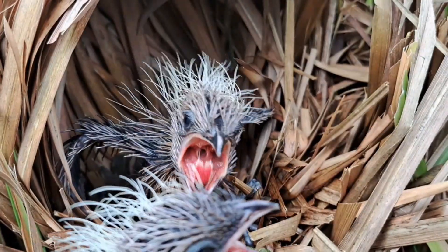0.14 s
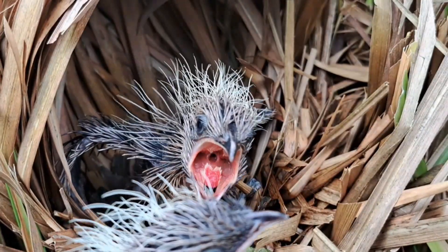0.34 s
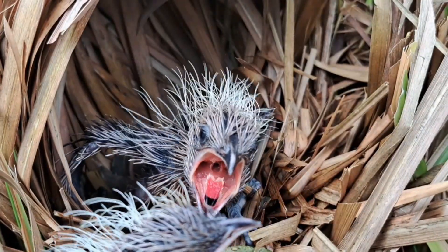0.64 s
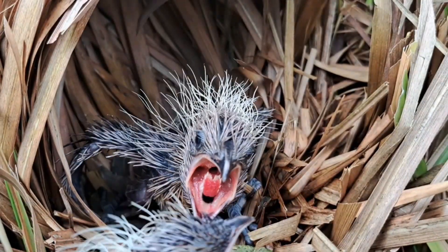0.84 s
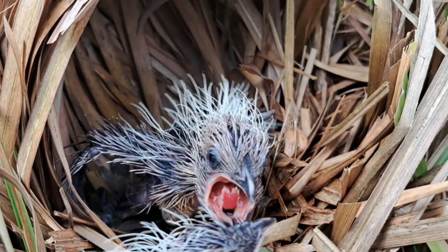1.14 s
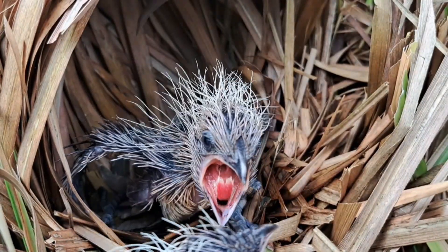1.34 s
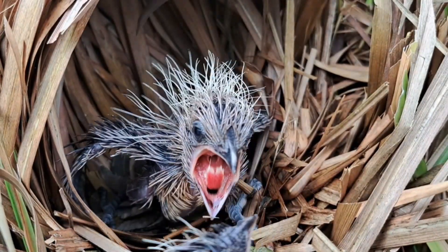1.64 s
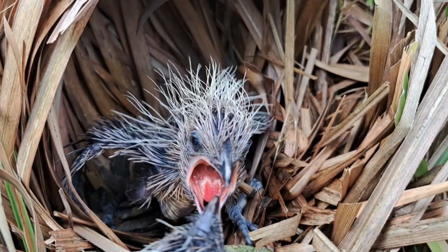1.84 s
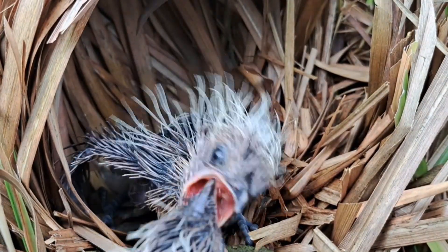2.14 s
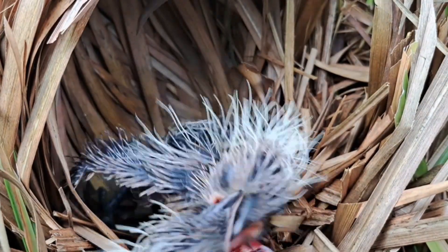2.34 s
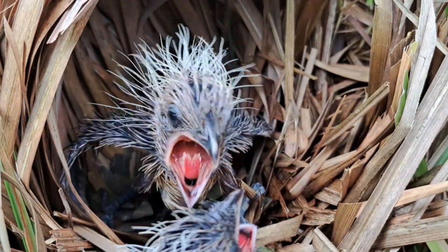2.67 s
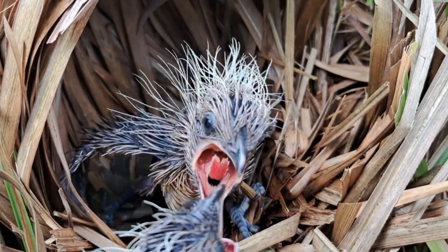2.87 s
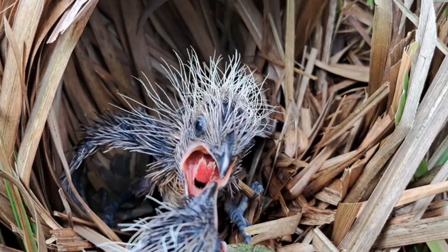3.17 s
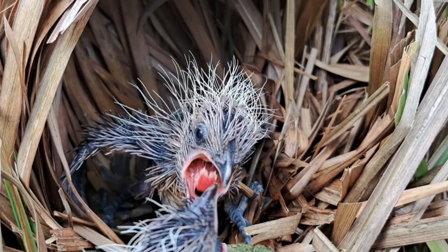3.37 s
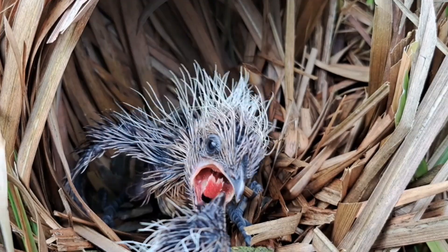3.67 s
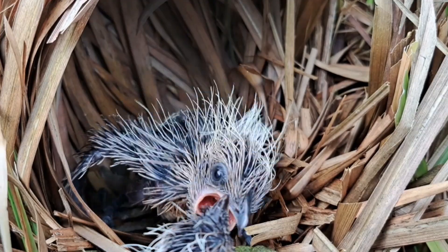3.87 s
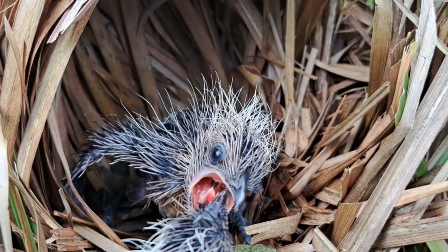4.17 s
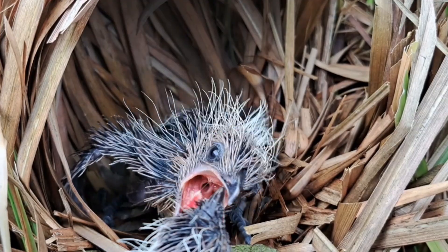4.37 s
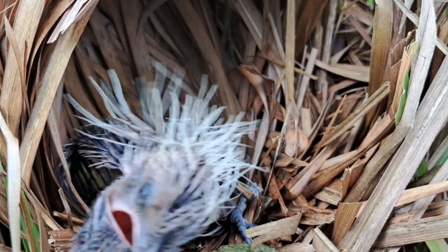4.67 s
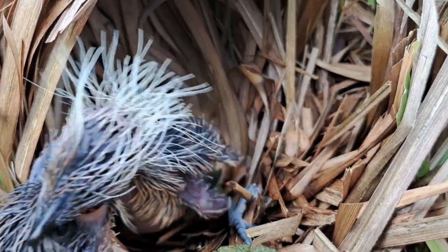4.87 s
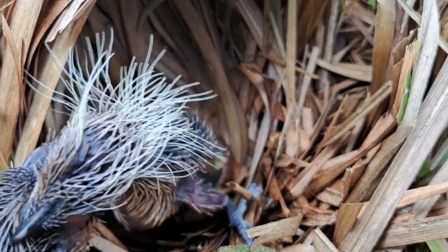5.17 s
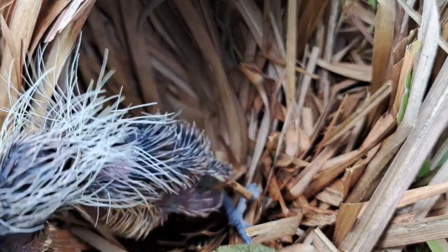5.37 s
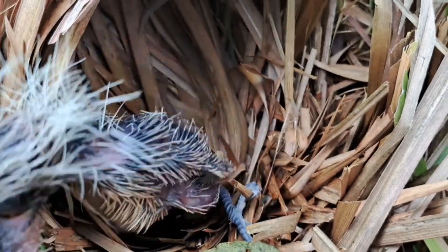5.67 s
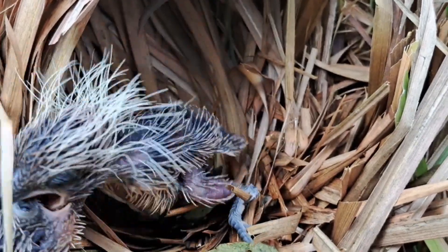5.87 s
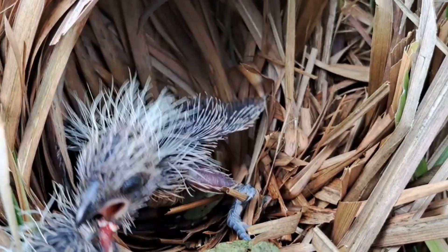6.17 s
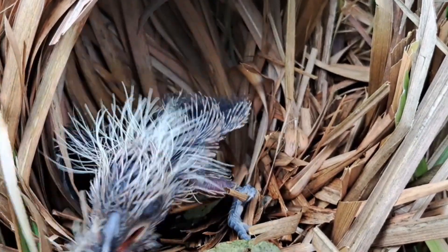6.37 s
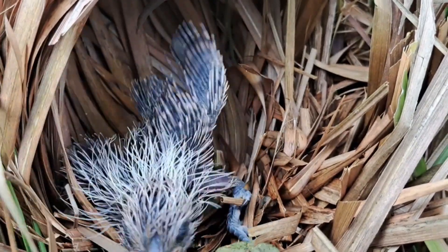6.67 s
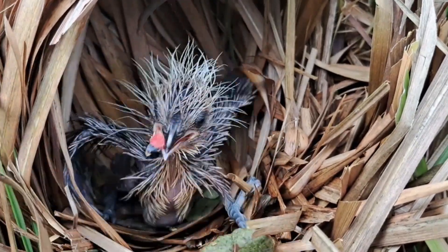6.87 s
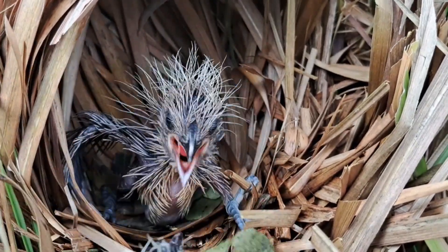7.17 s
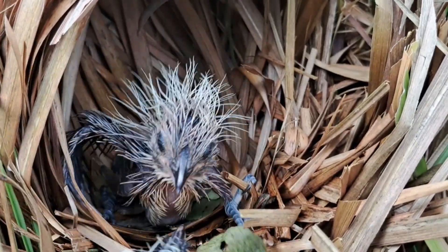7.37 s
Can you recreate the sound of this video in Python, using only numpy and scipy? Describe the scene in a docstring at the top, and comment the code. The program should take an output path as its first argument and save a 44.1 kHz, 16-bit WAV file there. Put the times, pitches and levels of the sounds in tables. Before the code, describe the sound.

From the start, nestlings very close on the left beg in harsh, buzzing rasps, each about an eighth of a second, around six a second, with a gritty throat buzz and bright sizzling top. Soft short whines slip between at 0.1, 0.5 and 0.7 s; a dry snap falls at 1.0. From 1.65 to 2.2 s the rasps crowd and overlap, then break off with a snap, straw rustle and small whines. At 2.5 s steady rasping resumes until 4.5 s. Then it is much quieter: hoarse whines and low squawks, scattered bill snaps and crackling straw, busiest around 5.3 to 5.8 s. From 6.1 s gliding squawks come closer together, growing brighter and stronger through 7.3 s, ending with one rasp to 7.5 s. The right side is weaker, muffled and diffuse; a faint low outdoor rumble continues throughout.

```python
"""Loud buzzing begging rasps close by on the left, about six a second, with soft whines between them.
The whines take over while the chicks jostle, then gliding squawks build up to a last rasp.
Nestlings in a nest of dry reeds: each call is a rough train of syrinx pulses that rings the throat
(1-7 kHz) and the open gape (8-15 kHz). Bills snap and straw crackles over a faint outdoor rumble."""
import sys
import numpy as np
from scipy import signal
from scipy.fft import rfft, irfft, next_fast_len
from scipy.io import wavfile
from scipy.ndimage import uniform_filter1d, map_coordinates

SR = 44100
rng = np.random.default_rng(int(sys.argv[2]) if len(sys.argv) > 2 else 0)


def persist_wave(psi):
    """Save psi, clipped to +-1, as 16-bit WAV."""
    counts = np.round(np.clip(psi, -1, 1) * 32767).astype(np.int16)
    wavfile.write(sys.argv[1], SR, np.atleast_2d(counts).T)


N = 331191

# Levels in the tables are relative; mix trims follow.
# Begging rasps. Each row: start in seconds, end in seconds, time to the peak in seconds, gape level in dB,
# gape brightness in dB per octave, throat level in dB, clear tone level in dB, base pitch in Hz,
# glide as a share of the pitch.
BEG_CALLS = [(-0.012, 0.113, 0.036, -26.5, -2, -43, -47.5, 1015, 0.064),
             (0.128, 0.261, 0.057, -30, -5.5, -43.5, -53, 983, 0.053),
             (0.295, 0.429, 0.043, -31, -6.5, -43, -54, 976, -0.0064),
             (0.448, 0.575, 0.044, -29.5, -1, -43.5, -48.5, 968, 0.01),
             (0.592, 0.718, 0.045, -28, 0, -42.5, -43.5, 983, 0.064),
             (0.734, 0.878, 0.053, -30.5, -9.5, -42, -46, 975, 0.077),
             (0.88, 1.008, 0.064, -31.5, -6.5, -42.5, -47.5, 966, 0.02),
             (1.05, 1.177, 0.044, -30, -4.5, -42, -50, 995, 0.14),
             (1.198, 1.341, 0.054, -30.5, -6, -42.5, -52.5, 1001, 0.053),
             (1.353, 1.509, 0.049, -31.0, -4.5, -43, -50, 990, 0.056),
             (1.507, 1.673, 0.049, -32, -5.5, -43.5, -51.0, 988, 0.07),
             (1.657, 1.769, 0.041, -29, 2, -42.5, -51.5, 991, 0.13),
             (1.724, 1.841, 0.039, -34, -14.5, -47.5, -49.5, 983, 0.17),
             (1.807, 1.926, 0.047, -29.5, 1, -41.5, -49.5, 998, 0.035),
             (1.881, 2.01, 0.051, -32.5, -13.5, -44.5, -49, 1018, 0.25),
             (1.978, 2.083, 0.045, -28.0, 2.5, -40.5, -49, 990, 0.077),
             (2.042, 2.155, 0.035, -32, -1.5, -42, -50.5, 966, 0.011),
             (2.138, 2.237, 0.032, -32, -4.5, -46.5, -51.5, 918, 0.01),
             (2.467, 2.627, 0.045, -29.5, -2, -43.5, -45, 897, -0.21),
             (2.612, 2.755, 0.065, -28.5, -8, -41, -45.5, 958, 0.017),
             (2.784, 2.918, 0.056, -30, -10, -43, -52, 974, -0.062),
             (2.941, 3.076, 0.052, -30.0, -8, -41.5, -44.5, 988, 0.07),
             (3.099, 3.233, 0.058, -31.5, -8, -44, -49, 979, 0.16),
             (3.257, 3.396, 0.056, -31, -5, -43.5, -49.5, 975, 0.14),
             (3.412, 3.58, 0.067, -34, -9.5, -43, -48.5, 986, 0.15),
             (3.566, 3.722, 0.071, -34, -8.0, -42.5, -47, 981, 0.19),
             (3.724, 3.88, 0.073, -32.5, -7, -42.5, -49.5, 996, 0.16),
             (3.891, 4.044, 0.072, -33, -4.5, -43, -53.5, 995, 0.086),
             (4.05, 4.205, 0.075, -32, -5, -43.0, -51, 997, 0.1),
             (4.213, 4.369, 0.082, -32, -5.5, -42.5, -50.5, 1012, 0.18),
             (4.38, 4.522, 0.069, -31.5, -3, -43, -51, 1020, 0.28),
             (7.35, 7.484, 0.053, -33, -4, -45, -54, 1023, 0.08)]
# Course of the begging. Each row: time in seconds, width of the swell as a share of the call,
# strongest harmonic as a number, breath relative to pulses as a ratio, lower voice in Hz,
# lower voice level in dB.
BEG_COURSE = [(0, 0.34, 1.68, 0.87, 679, -57), (1.099, 0.32, 2.06, 0.78, 754, -64),
              (2.001, 0.48, 1.45, 0.85, 743, -59.5), (2.15, 0.38, 1.77, 0.61, 729, -73),
              (2.552, 0.3, 1.84, 0.96, 733, -57), (3.1, .42, 1.5, 0.97, 794, -58),
              (4.4, 0.4, 1.53, 0.89, 839, -53.5), (7.4, 0.35, 1.05, 0.73, 763, -60.5)]
# Soft whines. Each row: start in seconds, end in seconds, throat level in dB, gape level in dB,
# clear tone level in dB, pitch at start in Hz, pitch at end in Hz, arch as a share of the pitch.
WHINE_CALLS = [(0.112, 0.182, -56, -42.5, -59, 957, 640, -0.041),
               (0.529, 0.634, -57.5, -41, -61, 893, 550, -0.056),
               (0.703, 0.792, -55, -35, -55, 950, 1050, -0.28),
               (2.308, 2.444, -56, -40.5, -57.5, 820, 980, -0.29),
               (2.44, 2.526, -62, -40.5, -68, 454, 850, 0.055),
               (2.88, 2.983, -56, -54, -65, 734, 910, -0.033),
               (4.401, 4.54, -46, -62, -60, 1047, 1000, 0.041),
               (4.539, 4.732, -57, -56.5, -66, 900, 630, 0.041),
               (4.731, 4.847, -49, -46.5, -50.5, 987, 840, 0),
               (5.164, 5.321, -53.5, -55.5, -55, 650, 720, 0.1),
               (5.589, 5.67, -50.5, -57, -61, 717, 490, 0.06),
               (5.948, 6.112, -53, -48.5, -51.5, 669, 940, -0.023),
               (6.313, 6.42, -54, -49, -59, 755, 800, 0.017),
               (6.733, 6.813, -46, -43, -52, 522.4, 380, 0.049),
               (7.223, 7.317, -59, -43.5, -53, 955, 1080, -0.0077)]
# Squawks. Each row: start in seconds, end in seconds, throat level in dB, gape level in dB,
# clear tone level in dB, gape peak as a share of the call, arch as a share of the pitch, then start and
# end in Hz of the pitch, of the throat resonance and of the gape resonance.
SQUAWK_CALLS = [(4.923, 5.124, -55.5, -53.5, -56, 0.31, -0.048, 760, 568, 2760, 2570, 12400, 12000),
                (5.351, 5.583, -52, -45.5, -57, .6, 0.049, 718, 833, 2570, 3900, 11600, 13100),
                (5.787, 5.952, -52.5, -51, -69, .5, 0.14, 768, 689, 2780, 4170, 8700, 11600),
                (6.118, 6.318, -50.5, -43.5, -59, 0.55, 0.03, 773, 906, 3470, 4500, 10800, 12500),
                (6.38, 6.547, -49, -38.5, -47.5, 0.37, 0.11, 659, 851, 2510, 4800, 10700, 12900),
                (6.496, 6.629, -48, -37, -49.5, 0.58, -0.094, 738, 739, 3700, 4150, 12000, 12200),
                (6.669, 6.798, -54, -35.5, -48.5, 0.43, -0.1, 864, 900, 3840, 1390, 13100, 11700),
                (6.802, 6.949, -50.5, -35, -49, 0.49, -0.089, 613, 1087, 1850, 2400, 14200, 14700),
                (7.001, 7.151, -49.5, -29.5, -60, 0.34, 0.24, 1006, 1070, 1420, 3370, 13600, 14300),
                (7.157, 7.29, -49, -32.5, -50.5, 0.63, -0.043, 765.5, 843, 3300, 3440, 12700, 13800)]
# Narrow to broad gliding bands of the calls: single harmonics, whistles and hoarse streaks.
# Each row: start in seconds, end in seconds, level in dB, start in Hz, end in Hz,
# arch as a share of the frequency, width in Hz.
GLIDING_BANDS = [(0.042, 0.048, -45.5, 1470, 1300, -0.016, 60), (2.15, 2.224, -50.5, 1830, 1670, .04, 25),
                 (2.15, 2.22, -62, 3700, 3100, 0.039, 60), (2.154, 2.225, -54, 4570, 4100, 0.035, 90),
                 (2.327, 2.419, -63.5, 734, 860, -0.22, 25), (4.449, 4.531, -50.5, 4150, 4450, 0, 398),
                 (4.664, 4.718, -62, 5800, 5500, 0.033, 60), (4.765, 4.827, -57.5, 5530, 5000, 0.034, 350),
                 (4.965, 5.058, -65, 1486, 1230, -0.052, 30),
                 (4.748, 4.828, -58.5, 3780, 3400, -0.011, 130),
                 (5.429, 5.569, -61.5, 4100, 4900, 0.032, 101),
                 (6.524, 6.618, -55, 3950, 4170, -0.013, 59.4),
                 (6.675, 6.712, -55.5, 3950, 2500, 0.029, 258), (7.018, 7.127, -58, 1088, 1180, .11, 70),
                 (7.108, 7.148, -55, 3500, 4250, -0.0054, 850), (7.352, 7.443, -57, 4900, 5400, .02, 1010)]
# Throat resonance of the rasps, before tilt. Each row: frequency in Hz, gain in dB.
BEG_THROAT_RESPONSE = [(300, -46), (560, -12), (750, -6), (950, -15.5), (1200, -3), (1500, 2.5),
                       (1950, -4.5), (2400, -1.5), (2950, -5.5), (3300, -2.5), (3900, -1.5), (4700, 1.5),
                       (5250, -8), (5800, -1.5), (6700, 0.5), (7400, -8.5), (8600, -9)]
# Gape resonance of the rasps, before tilt. Each row: frequency in Hz, gain in dB.
BEG_GAPE_RESPONSE = [(6500, -34.5), (7500, -25), (8300, -15.5), (9200, -13), (10200, -6), (11000, -3),
                     (12000, -6.5), (13000, -6), (14600, -4), (15600, -10.5)]
# Throat resonance of whines and squawks, before tilt. Each row: frequency in Hz, gain in dB.
SOFT_THROAT_RESPONSE = [(300, -15), (500, -9.5), (740, -1), (1050, -3), (1550, 2.5), (2300, -2), (3100, -3),
                        (4100, -3.5), (5000, -4), (6000, -7.5), (7400, -19), (8800, -36)]
# Gape resonance of whines and squawks, before tilt. Each row: frequency in Hz, gain in dB.
SOFT_GAPE_RESPONSE = [(6000, -30.5), (7500, -17.5), (9000, -9.5), (10500, -5.5), (12000, -6.5), (13300, -4),
                      (14500, -11), (15600, -5.5)]
# Bill snaps and breaking straws. Each row: time in seconds, body level in dB, crack level in dB.
SNAP_EVENTS = [(0.998, -53, -45), (2.23, -52.5, -45), (2.241, -64, -46), (4.656, -77, -43.5),
               (4.741, -72, -46), (4.885, -75, -41.5), (5.072, -83, -49.5), (5.271, -59, -46),
               (5.323, -63, -41), (5.33, -47, -53), (5.509, -51, -49), (5.676, -61, -47),
               (5.711, -63, -47.5), (5.75, -70, -46), (5.775, -61, -53), (6.64, -63, -53),
               (6.726, -80, -40.5), (7.332, -72, -52)]
# Spectrum of the dull knock. Each row: frequency in Hz, gain in dB.
KNOCK_RESPONSE = [(300, -16.5), (800, -15.5), (1500, -3), (2200, -9.5), (3200, -11), (4500, -7),
                  (7000, -27), (12000, -43)]
# Spectrum of the bright crack. Each row: frequency in Hz, gain in dB.
CRACK_RESPONSE = [(3000, -7), (7000, -5), (10500, 0), (13500, 4.5), (15500, 1.5)]
# Shuffling in the straw, one table per scuffle. Each row: time in seconds, crackle level in dB.
SCUFFLES = [
    [(2.15, -64), (2.26, -54.5), (2.45, -54)],
    [(4.5, -52), (4.9, -49.5), (5.12, -61), (5.35, -44), (5.6, -51), (6.25, -48), (6.6, -63), (6.98, -55),
     (7.51, -99)],
]
# The nest as the shaded right port hears it. Each row: frequency in Hz, gain in dB.
FAR_PORT_RESPONSE = [(400, -21), (770, -12.5), (1200, -14.5), (1800, -19.5), (2740, -26), (4200, -17.5),
                     (5300, -4.5), (6500, -11.5), (8000, 0.5), (9800, -26), (12000, -17.5), (15000, -31)]
# Part of that scattered by the reeds. Each row: frequency in Hz, scattered level in dB.
REED_SCATTER = [(700, -4.5), (2000, 6), (4000, -0.5), (8000, 1), (15000, 12.5)]
# Outdoor air at the left port. Each row: frequency in Hz, relative gain in dB.
AIR_LEFT_RESPONSE = [(20, -29), (55, -25), (90, -14), (140, 0), (220, -17), (400, -17), (1000, -18.5),
                     (4000, -15), (15000, -25)]
# Outdoor air at the right port. Each row: frequency in Hz, relative gain in dB.
AIR_RIGHT_RESPONSE = [(20, -13), (40, -0.5), (58, 8.5), (90, 0), (140, 1.5), (260, -4.5), (450, -15),
                      (1000, -25), (4000, -33.5), (15000, -23.5)]
# Slow course of the rumble. Each row: time in seconds, level in dB.
RUMBLE_COURSE = [(0, 2), (3.0, 1), (4.2, 2.5), (5.5, -4.5), (7.51, -0.5)]

BEG_ATTACK_S, BEG_RELEASE_S = 0.03, 0.0397  # the bill opens and shuts
BEG_FALLOFF = 1.5  # steepness of the flanks of the swell
PITCH_SAG = 0.05  # share of the pitch missing until the effort builds
END_SWEEP = 0.8  # the glide steepens as the call ends
LOWER_VOICE_DIP, LOWER_VOICE_RISE, LOWER_VOICE_SPREAD = 0.25, 0.2004, 0.049  # shares of its pitch
LOWER_VOICE_OCTAVE_DB = 4
OVERTONES_DB, OVERTONE_SPREAD_DB, OVERTONE_WIDTH_HZ = -8, 4, 170  # level before loss to breath
WHINE_PEAK, WHINE_SHARPNESS = 0.41, 2.4
WHINE_RING_RATIO, WHINE_RING_WIDTH_HZ, WHINE_RING_DB = 4.5, 1600, -4.5  # ratio to the pitch
WHINE_CLARITY_DB = -0.5  # harmonics against rasp in the resonance
SQUAWK_PEAK, SQUAWK_SHARPNESS = 0.44, 3.8
SQUAWK_RING_WIDTH_HZ, SQUAWK_RING_DB = 1220, -2.5
SQUAWK_GAPE_WIDTH_HZ, SQUAWK_GAPE_DB = 2850, -8
SQUAWK_CLARITY_DB = -5  # added to tone minus throat level: harmonics in the throat resonance
BEG_JITTER_PER_BREATH, SOFT_JITTER = 0.042, 0.04  # unevenness of the pulses, as a share of a cycle
WOBBLE = 0.013  # share of the pitch
PULSE_DIRECT = 1.8  # direct pulse against its quick echoes
PUFF_DECAY_S = 0.0006
GUSTS_PER_S = 8.8
CUTOFF_HZ = 15700


def begs():
    """Loud buzzing rasps: pitch climbs with effort; swell, breath and lower voice change over the bout."""
    out = np.zeros(N)
    course = np.transpose(BEG_COURSE)
    for start, end, peak_s, gape_db, bright_db, throat_db, tone_db, hz, slope in BEG_CALLS:
        width, strongest, breath, lower_hz, lower_db = (
            np.interp(start, course[0], column) for column in course[1:])
        u = phase_of(start, end)
        effort = beg_effort(u, end - start, peak_s, width)
        sag = PITCH_SAG * (1 - effort) * (1 - u)
        pitch = hz * (1 - sag + slope * (u - 0.5 + END_SWEEP * u ** 6))
        tone, rasp = syrinx(pitch, strongest, BEG_JITTER_PER_BREATH * breath,
                            shimmer_db=0.6, hiss=breath, rolloff_db=-17.5)
        low = throat(rasp, effort, BEG_THROAT_RESPONSE, tilt_db=1.5)
        low = low + from_db(-18) * hollow(effort, u, hz)
        low = low + from_db(OVERTONES_DB) * max(1 - breath, 0) * overtones(effort, pitch)
        clear = from_db(tone_db - 1.0) * effort ** 1.43 * tone
        clear = clear + from_db(lower_db) * lower_voice(effort, u, lower_hz)
        high = gape(rasp, effort, BEG_GAPE_RESPONSE, bright_db)
        add(out, start, from_db(throat_db - 0.8) * low + clear + from_db(gape_db) * high)
    return out


def beg_effort(u, length_s, peak_s, width):
    """The bill opens quickly, the pressure swells to a peak and fades, and the bill shuts."""
    t = u * length_s
    opening = np.sin(np.pi / 2 * np.minimum(t / BEG_ATTACK_S, 1)) ** 1.2
    shutting = np.sin(np.pi / 2 * np.minimum((length_s - t) / BEG_RELEASE_S, 1)) ** 2
    pressure = 1 / (1 + ((t - peak_s) / (width * length_s)) ** 2) ** BEG_FALLOFF
    return opening * shutting * pressure


def hollow(effort, u, hz):
    """Two hollow resonances part as the bill opens and meet as it shuts, differently in every call."""
    chance = rng.standard_normal(3)
    opening = effort ** (0.5 * np.exp(0.301 * chance[0]))
    meeting = 1.33 + 0.0658 * chance[1]  # ratio to the base pitch
    lower = narrow_noise(hz * (meeting + (0.9 - meeting) * opening), width_hz=145.6)
    upper = narrow_noise(hz * (meeting + (1.92 - meeting) * opening), width_hz=190)
    return (0.5 + u) * effort ** 0.13 * lower + from_db(3.5 + 2 * chance[2]) * effort ** 0.1 * upper


def overtones(effort, pitch):
    """Hoarse bands on the fourth to seventh harmonics; each call favours different ones."""
    bands = sum(from_db(OVERTONE_SPREAD_DB * rng.standard_normal())
                * narrow_noise(k * pitch, OVERTONE_WIDTH_HZ) for k in range(4, 8))
    return effort ** 0.5 * bands


def lower_voice(effort, u, hz):
    """A second voice and its octave, whose pitch dips with effort and rises through the call."""
    base_hz = hz * (1 + LOWER_VOICE_SPREAD * rng.standard_normal())
    pitch = base_hz * (1 + LOWER_VOICE_DIP * (1 - effort) + LOWER_VOICE_RISE * (u - 0.5))
    octave = narrow_noise(2 * pitch, width_hz=60.0)
    voice = narrow_noise(pitch, width_hz=38.5) + from_db(LOWER_VOICE_OCTAVE_DB) * octave
    return effort * rms_one(voice)


def squawks():
    """Whining and squawking calls, hoarse to clear, with gliding throat and gape resonances."""
    out = np.zeros(N)
    for start, end, throat_db, gape_db, tone_db, gape_peak, arch, *ends_hz in SQUAWK_CALLS:
        u = phase_of(start, end)
        effort = swell(u, SQUAWK_PEAK, SQUAWK_SHARPNESS)
        opening = swell(u, gape_peak, 2.8)
        pitch_hz, throat_hz, gape_hz = np.reshape(ends_hz, (-1, 2))
        tone, rasp = syrinx(glide(u, *pitch_hz, arch), strongest=2.1, jitter=SOFT_JITTER,
                            shimmer_db=1.0, hiss=1.2, rolloff_db=-3.5)
        voiced = rasp + from_db(SQUAWK_CLARITY_DB + tone_db - throat_db) * tone
        throat_ring = resonate(voiced, glide(u, *throat_hz), SQUAWK_RING_WIDTH_HZ)
        low = throat(rasp, effort, SOFT_THROAT_RESPONSE, tilt_db=0.9)
        low = low + from_db(SQUAWK_RING_DB) * effort ** 0.58 * throat_ring
        gape_ring = resonate(rasp, glide(u, *gape_hz), SQUAWK_GAPE_WIDTH_HZ)
        high = from_db(-4.0) * gape(rasp, opening, SOFT_GAPE_RESPONSE, tilt_db=-0.5)
        high = high + from_db(SQUAWK_GAPE_DB) * opening * gape_ring
        clear = from_db(tone_db) * effort * tone
        add(out, start, from_db(throat_db) * low + clear + from_db(gape_db) * high)
    return out


def whines():
    """Soft, hoarse calls with the bill nearly shut; a throat resonance glides with the pitch."""
    out = np.zeros(N)
    for start, end, throat_db, gape_db, tone_db, first_hz, last_hz, arch in WHINE_CALLS:
        u = phase_of(start, end)
        effort = swell(u, WHINE_PEAK, WHINE_SHARPNESS)
        pitch = glide(u, first_hz, last_hz, arch)
        tone, rasp = syrinx(pitch, strongest=1.9, jitter=SOFT_JITTER,
                            shimmer_db=0.7, hiss=2.5, rolloff_db=-5.0)
        voiced = rasp + from_db(WHINE_CLARITY_DB) * tone
        ring = resonate(voiced, WHINE_RING_RATIO * pitch, WHINE_RING_WIDTH_HZ)
        low = throat(rasp, effort, SOFT_THROAT_RESPONSE, tilt_db=1.1)
        low = low + from_db(WHINE_RING_DB) * effort ** 0.5 * ring
        clear = from_db(tone_db) * effort ** 1.2 * tone
        high = gape(rasp, effort, SOFT_GAPE_RESPONSE, tilt_db=-10.5)
        add(out, start, from_db(throat_db) * low + clear + from_db(gape_db) * high)
    return out


def gliding_bands(level_db):
    """Single harmonics, whistles and hoarse streaks: noise bands, narrow to broad, that swell and glide."""
    out = np.zeros(N)
    for start, end, db, first_hz, last_hz, arch, width_hz in GLIDING_BANDS:
        u = phase_of(start, end)
        band = narrow_noise(glide(u, first_hz, last_hz, arch), width_hz)
        add(out, start, from_db(db + level_db) * swell(u, 0.46, 0.75) * band)
    return out


def syrinx(pitch, strongest, jitter, shimmer_db, hiss, rolloff_db):
    """Clear membrane harmonics, and their buzz: a sharp pulse and a puff of turbulence per cycle."""
    size = len(pitch)
    cycles = np.cumsum(pitch * (1 + WOBBLE * drift(size, 220))) / SR
    at = np.flatnonzero(np.diff(np.floor(cycles)))
    chance = rng.standard_normal((512, 2))[:len(at)]
    at = np.round(at + jitter * chance[:, 0] * SR / pitch[at])
    at = np.clip(at, 0, size - 1).astype(int)
    pulses = np.zeros(size)
    pulses[at] = from_db(shimmer_db * chance[:, 1])
    puff_level = signal.lfilter([1], [1, -np.exp(-1 / (PUFF_DECAY_S * SR))], pulses)
    puffs = puff_level * rng.standard_normal(size)
    tone = sum(from_db(rolloff_db * abs(k - strongest)) * np.sin(2 * np.pi * k * cycles)
               for k in range(1, 8))
    rasp = rms_one(pulses - pulses.mean()) + hiss * rms_one(puffs)
    return rms_one(tone), rms_one(scatter(rasp, decay_s=0.0058, direct=PULSE_DIRECT))


def throat(rasp, effort, spectrum, tilt_db):
    """The rasp rings the throat."""
    return effort ** 0.31 * rms_one(colour(rasp, spectrum, tilt_db))


def gape(rasp, effort, spectrum, tilt_db):
    """The rasp rings the gape, more strongly the wider the bill opens."""
    return effort * rms_one(colour(rasp, spectrum, tilt_db))


def snaps(body_db, crack_db, body_s, crack_s):
    """Short dry cracks with a duller knock beneath: decaying noise bursts."""
    out = np.zeros(N)
    t = np.arange(2048) / SR
    for start, low_db, high_db in SNAP_EVENTS:
        body = rms_one(colour(rng.standard_normal(len(t)) * np.exp(-t / body_s), KNOCK_RESPONSE))
        crack = rms_one(colour(rng.standard_normal(len(t)) * np.exp(-t / crack_s), CRACK_RESPONSE))
        add(out, start, from_db(low_db + body_db) * body + from_db(high_db + crack_db) * crack)
    return out


def straw(per_s, spread_db, decay_s):
    """Dry blades slip against each other in many small clicks."""
    t = np.arange(N) / SR
    level = sum(from_db(np.interp(t, *np.transpose(scuffle), left=-np.inf, right=-np.inf))
                for scuffle in SCUFFLES)
    strength_db = spread_db * np.minimum(rng.exponential(1, N), 4)
    clicks = (rng.random(N) < per_s / SR) * from_db(strength_db)
    decays = signal.lfilter([1], [1, -np.exp(-1 / (decay_s * SR))], clicks + 1e-18)
    grains = decays * rng.standard_normal(N)
    return level * rms_one(colour(grains, KNOCK_RESPONSE) + 0.5 * colour(grains, CRACK_RESPONSE))


def far_port(near, lag_s, scatter_s, shift_rate):
    """The shaded right port: late, weak direct sound plus nest-wall echoes that shift as the chicks move."""
    direct = map_coordinates(near, [np.arange(N) - lag_s * SR], order=3)
    weights = np.array([drift(N, shift_rate) for _ in range(5)])
    weights = weights / np.linalg.norm(weights, axis=0)
    scattered = sum(w * scatter(near, scatter_s) for w in weights)
    # direct power is what scattering leaves, at least 1 %
    direct_share = [(hz, 10 * np.log10(max(1 - from_db(db) ** 2, 0.01))) for hz, db in REED_SCATTER]
    return colour(colour(direct, direct_share) + colour(scattered, REED_SCATTER), FAR_PORT_RESPONSE)


def air(spectrum, level_db, gust_db):
    """Faint outdoor rumble: coloured noise that swells slowly, with gusts of spread gust_db."""
    swell_db = np.interp(np.arange(N) / SR, *np.transpose(RUMBLE_COURSE))
    swell_db = swell_db + gust_db * drift(N, GUSTS_PER_S)
    return from_db(level_db + swell_db) * rms_one(colour(rng.standard_normal(N), spectrum))


def phase_of(start, end):
    """Progress through a call, 0 to 1, at every sample."""
    size = int((end - start) * SR)
    return (np.arange(size) + 0.5) / size


def swell(u, peak, sharpness):
    """Air pressure swells and falls once per call."""
    return ((u / peak) ** peak * ((1 - u) / (1 - peak)) ** (1 - peak)) ** sharpness


def glide(u, first_hz, last_hz, arch=0):
    """A glide through a call, bowed up or down in the middle."""
    return (first_hz + (last_hz - first_hz) * u) * (1 + arch * np.sin(np.pi * u))


def resonate(x, hz, width_hz):
    """Pass x through one resonance with a moving centre (shift to 0 Hz, low-pass, shift back); rms 1."""
    turn = np.exp(2j * np.pi * np.cumsum(hz) / SR)
    lowpass = signal.butter(2, width_hz / 2, fs=SR, output="sos")
    return rms_one((signal.sosfilt(lowpass, x / turn) * turn).real)


def narrow_noise(hz, width_hz):
    """Noise band around a moving centre: a carrier with randomly drifting amplitude and phase; rms 1."""
    wander = drift(len(hz), width_hz) + 1j * drift(len(hz), width_hz)
    return rms_one((wander * np.exp(2j * np.pi * np.cumsum(hz) / SR)).real)


def scatter(x, decay_s, direct=0):
    """Direct sound plus a burst of quick random echoes: fine ripples in the spectrum, new each time."""
    t = np.arange(256) / SR
    echoes = rng.standard_normal(len(t)) * np.exp(-t / decay_s)
    response = rfft(echoes / np.linalg.norm(echoes) + direct * (t == 0), 512)
    broad_tint = np.sqrt(uniform_filter1d(np.abs(response) ** 2, size=11))
    ripples = irfft(response / broad_tint)[:len(t)]
    return signal.fftconvolve(x, ripples)[:len(x)]


def colour(x, spectrum, tilt_db=0):
    """Pass x through a (Hz, dB) response, tilted by dB per octave."""
    size = next_fast_len(len(x) + 512)
    octave = np.log2(np.maximum(np.arange(size // 2 + 1) * SR / size, 10))
    hz, db = np.transpose(spectrum)
    knots = np.log2(hz)
    slope_db = tilt_db * (np.clip(octave, knots[0], knots[-1]) - knots.mean())
    gain = from_db(np.interp(octave, knots, db) + slope_db)
    return irfft(rfft(x, size) * gain, size)[:len(x)]


def drift(size, rate):
    """Smooth chance with spread about 1: a spline through `rate` random knots a second."""
    knots = rng.standard_normal(2048)
    return map_coordinates(knots, [np.arange(size) * rate / SR], order=3, mode="wrap")


def from_db(db):
    """Decibels to gain."""
    return 10 ** (np.asarray(db) / 20)


def rms_one(x):
    """Scale to unit rms."""
    return x / np.sqrt(np.mean(x ** 2) + 1e-20)


def add(track, start_s, sound):
    """Mix a sound into the track at a time."""
    at = int(round(start_s * SR))
    first, last = max(at, 0), min(at + len(sound), N)
    track[first:last] += sound[first - at:last - at]


def scene():
    """Chicks and straw close to the left port, shaded at the right; air at both."""
    near = from_db(0.11) * begs() + from_db(-0.1) * squawks() + from_db(-1.5) * whines()
    near = near + gliding_bands(level_db=6.0)
    near = near + snaps(body_db=-1.0, crack_db=-4.5, body_s=0.0055, crack_s=0.0028)
    near = near + straw(per_s=460, spread_db=4.5, decay_s=0.0071)
    left = near + air(AIR_LEFT_RESPONSE, level_db=-62, gust_db=0.0)
    right = far_port(near, lag_s=0.0001, scatter_s=0.013, shift_rate=12)
    right = right + air(AIR_RIGHT_RESPONSE, level_db=-60.5, gust_db=2.57)
    return np.array([left, right])


def record(dry):
    """A steep elliptic low-pass cuts the top."""
    return signal.sosfilt(signal.ellip(12, 0.2, 80, CUTOFF_HZ, fs=SR, output="sos"), dry)


dry = scene()
out = record(dry)
persist_wave(out)
```